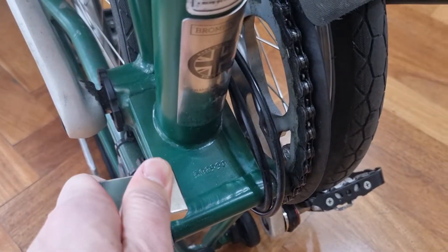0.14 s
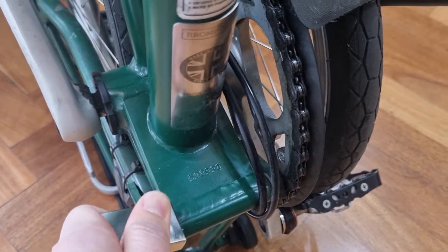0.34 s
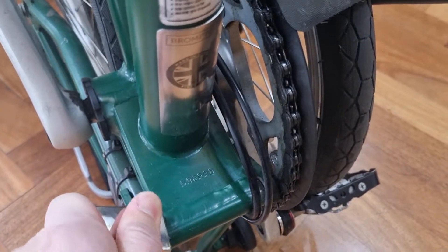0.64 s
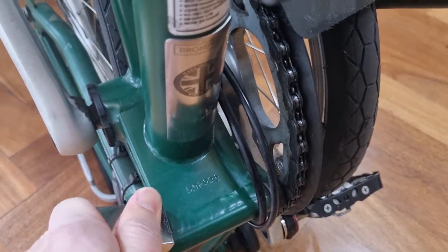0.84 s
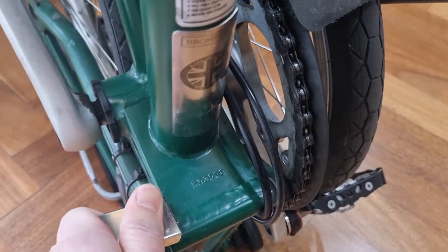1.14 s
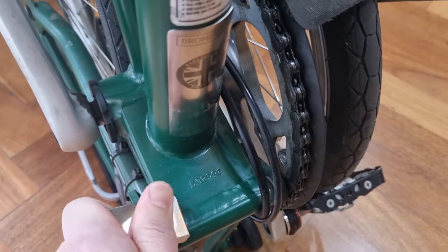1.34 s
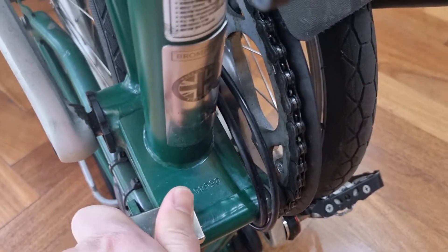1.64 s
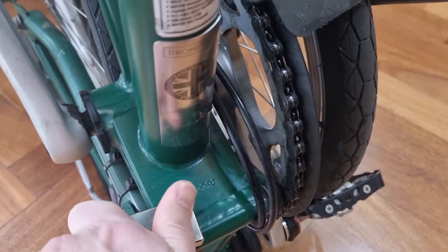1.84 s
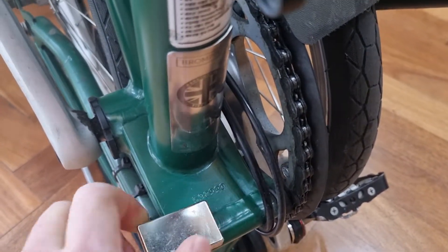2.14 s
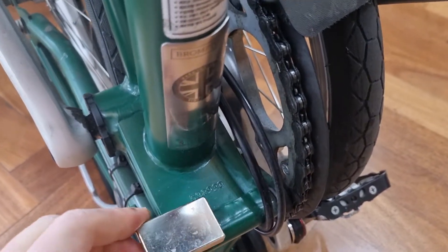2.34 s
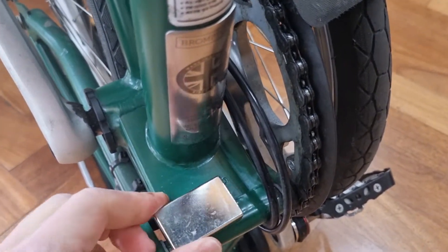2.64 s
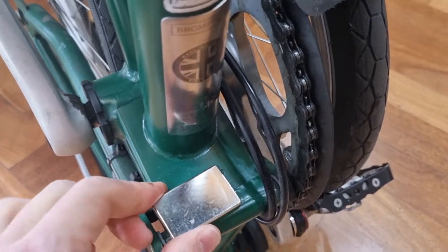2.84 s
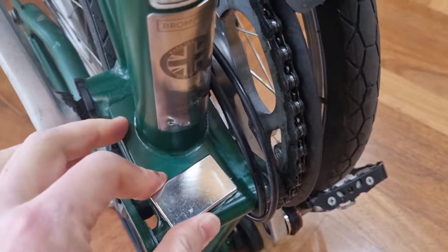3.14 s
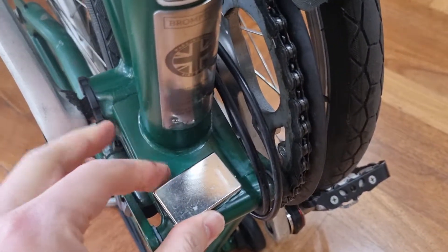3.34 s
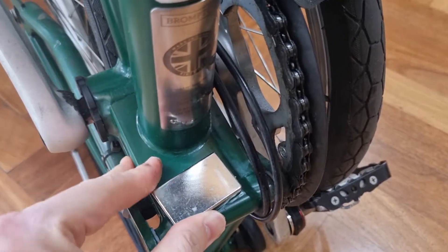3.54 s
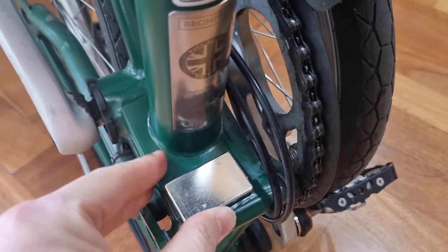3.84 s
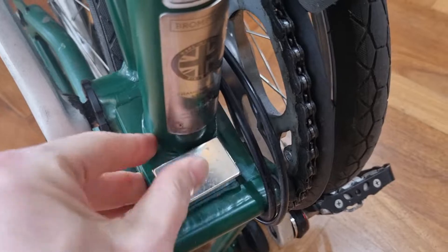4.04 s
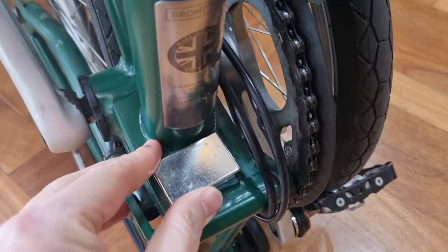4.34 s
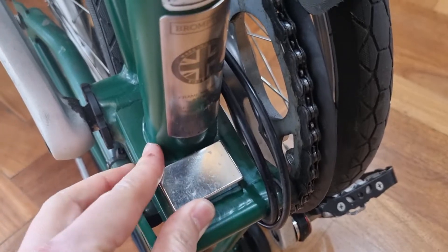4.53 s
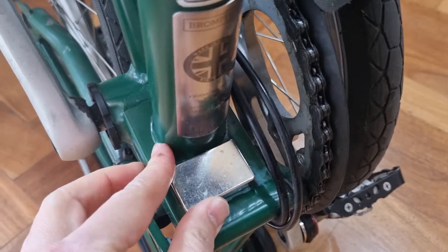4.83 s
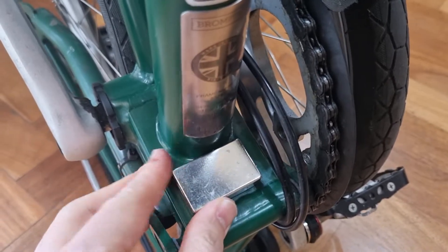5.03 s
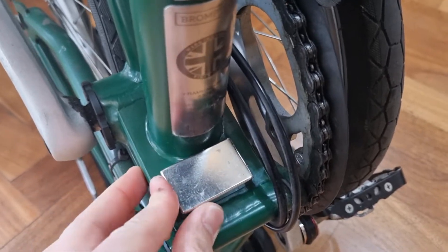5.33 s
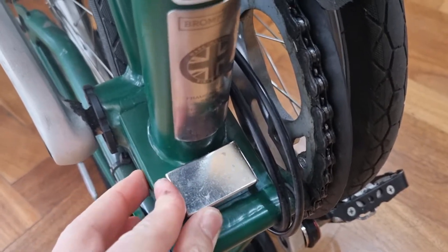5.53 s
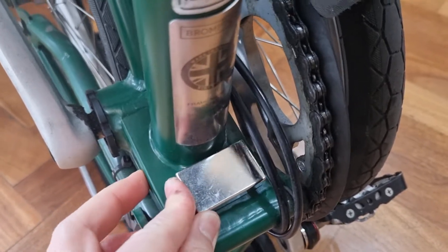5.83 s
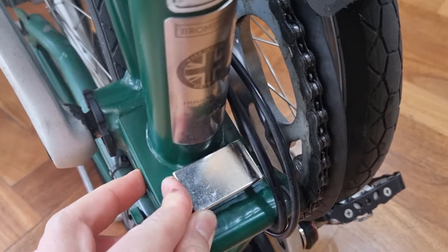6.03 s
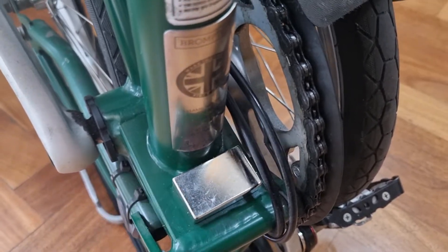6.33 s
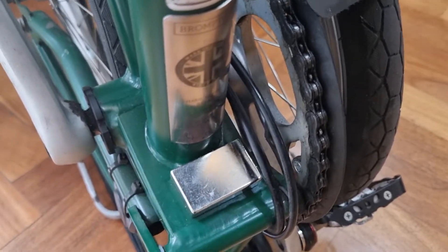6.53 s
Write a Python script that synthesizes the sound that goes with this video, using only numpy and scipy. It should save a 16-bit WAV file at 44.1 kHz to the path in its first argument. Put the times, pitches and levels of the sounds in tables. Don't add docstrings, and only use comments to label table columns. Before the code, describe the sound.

A heavy magnet is pulled off a steel bicycle frame, then snaps back three times with hard, bright metallic clacks in a quiet room.

```python
import sys
import numpy as np
from scipy import signal
from scipy.fft import rfft, irfft
from scipy.io import wavfile
from scipy.ndimage import uniform_filter1d

SR = 44100
rng = np.random.default_rng(int(sys.argv[2]) if len(sys.argv) > 2 else 0)


def file_out(sig):
    cols = np.atleast_2d(sig).T
    lim = np.clip(cols, -1, 1)
    pcm = np.round(lim * 32767).astype(np.int16)
    wavfile.write(sys.argv[1], SR, pcm)


def voltage_ratio(decibels):
    exponent = np.asarray(decibels, float) / 20
    return 10 ** exponent


N = 294367
PUFF_LEAD_S = 64 / SR
PORT_LAG_S = .00022


def rms_one(x):
    return x / np.sqrt(np.mean(x ** 2) + 1e-20)


def in_time(rows):
    s, *columns = np.transpose(rows)
    return [np.interp(np.arange(N) / SR, s, c) for c in columns]


def at_hz(points, hz):
    table_hz, values = np.array(points).T
    return np.interp(np.log(np.maximum(hz, 1)), np.log(table_hz), values)


def band(x, low_hz, high_hz, order=2):
    return signal.sosfilt(signal.butter(order, [low_hz, high_hz], "band", fs=SR, output="sos"), x)


def resonance(hz, mode_hz, width_hz):
    return 1 / (1 + (2 * (hz - mode_hz) / width_hz) ** 2)


def drift(rate):
    knots = rng.standard_normal(int(rate * N / SR) + 2)
    curve = np.interp(np.arange(N) * rate / SR, np.arange(len(knots)), knots)
    return uniform_filter1d(curve, size=2000)


def add(out, s, sound):
    i = int(s * SR)
    out[..., i:i + sound.shape[-1]] += sound[..., :max(N - i, 0)]


def place(out, s, sound, pan_db):
    add(out[0], s, sound[0] * voltage_ratio(pan_db / 2))
    add(out[1], s + PORT_LAG_S, sound[1] * voltage_ratio(-pan_db / 2))


def ring(hz, t60, rise_s, seconds):
    t = np.arange(int(seconds * SR)) / SR
    onset = (1 - np.exp(-t / rise_s)) ** 2
    decay = voltage_ratio(-60 * t / np.reshape(t60, (-1, 1)))
    return onset * decay * np.sin(2 * np.pi * np.reshape(hz, (-1, 1)) * t)


def causal(db):
    folded = irfft(db * np.log(10) / 20)
    folded[1:len(db) - 1] *= 2
    folded[len(db):] = 0
    return np.exp(rfft(folded))


def burst(colour_db, t60, rise_s):
    t = np.arange(8192) / SR
    shared, left, right = rng.standard_normal((3, 8192))
    puff = shared + np.array([left, right])
    puff = puff * (1 - np.exp(-t / rise_s)) * voltage_ratio(-60 * t / t60)
    puff = np.roll(puff, 64, axis=1)
    colour = causal(colour_db(np.fft.rfftfreq(8192, 1 / SR) + 1))
    puff = irfft(rfft(puff) * colour)[:, :6000]
    return puff / abs(puff).max()


# (frequency [Hz], likeness [-1 to 1])
LIKENESS = [(60, 0.97), (130, 0.97), (290, 0.43), (640, -0.46), (1410, -0.46), (3100, -0.11), (6820, 0.04),
            (15000, 0.01)]


def stereo_noise(spectrum, low_hz, high_hz):
    hz = np.fft.rfftfreq(N, 1 / SR)
    mid, side = rfft(rng.standard_normal((2, N))) * voltage_ratio(at_hz(spectrum, hz))
    alike = np.clip(at_hz(LIKENESS, hz), -1, 1)
    mid = np.sqrt(1 + alike) * mid
    side = np.sqrt(1 - alike) * side
    inside = (hz > low_hz) & (hz < high_hz)
    rms = np.sqrt(2 * np.sum(abs(mid[inside]) ** 2)) / N
    return irfft((mid + side * np.array([[1], [-1]])) / rms, N)


# (frequency [Hz], density [dB per Hz])
ROOM_TONE = [(60, -18), (90, -1.5), (110, -10.5), (160, -12), (250, -17.5), (340, -15), (450, -20),
             (560, -17), (800, -22.5), (1200, -27), (1800, -38.5), (3000, -53.5)]


def traffic_wash():
    fade_db = -0.41 * np.arange(N) / SR
    return voltage_ratio(-70 + fade_db + .6 * drift(9.0)) * stereo_noise(ROOM_TONE, 300, 1500)


# (frequency [Hz], density [dB per Hz])
HISS = [(800, -10), (2000, 0), (4000, -5.5), (7500, -10), (8500, -16), (16000, -16)]


def hiss():
    return voltage_ratio(-94) * stereo_noise(HISS, 800, 16000)


# (time [s], level [dB])
RUB = [(0, -79), (.3, -90), (.4, -74), (.8, -84), (2.4, -84.5), (3.6, -93), (4.3, -89.5), (4.7, -100)]
# (frequency [Hz], density [dB per Hz])
RUB_COLOUR = [(800, -12), (2000, 2.5), (3500, -2), (5000, -7.5), (7500, -3.5), (8500, -13.5),
              (15000, -18.5)]


def skin_rub():
    level_db = in_time(RUB)[0]
    return voltage_ratio(level_db) * stereo_noise(RUB_COLOUR, 800, 16000)


# (time [s], frequency [Hz], level [dB])
DRONE = [(0.0, 69.7, -51.5), (0.39, 70.7, -54.5), (0.5, 60.79, -70), (0.63, 71.83, -51.5),
         (0.85, 74.85, -47.5), (1.6, 75.24, -43.5), (2.25, 74.27, -59.5), (2.32, 76.7, -61.5),
         (2.51, 76, -47.5), (2.84, 72.33, -57.5), (3.53, 73.7, -44.5), (4.5, 70.04, -48), (4.57, 69.3, -61),
         (4.66, 60.8, -52.5), (5.5, 62.72, -72.5), (6.04, 61.8, -52.5), (6.13, 58.46, -70), (6.67, 59, -53)]


def drone():
    waver_db, waver_per_s = 1.5, 6.0
    gear_s = 5.17
    hz, db = in_time(DRONE)
    slowed = np.clip((np.arange(N) / SR - gear_s) / 0.13, 0, 1)
    turn = 2 * np.pi * np.cumsum(hz) / SR + np.array([[.1], [-.1]])
    line = np.sqrt(2) * voltage_ratio(db + waver_db * drift(waver_per_s)) * np.sin(turn)

    note_noise, rumble_noise = rng.standard_normal((2, N))
    loose_note = voltage_ratio(-68.5) * rms_one(band(note_noise, 130, 135))
    octave = slowed * voltage_ratio(-62 + waver_db * drift(waver_per_s)) * np.sin(2 * turn[0])

    both_ports = rumble_noise + 0.085 * note_noise * np.array([[1], [-1]])
    gusts_db = -56.5 + 5.5 * drift(4.0)
    rumble = voltage_ratio(gusts_db) * rms_one(band(both_ports, 44, 70, order=3))
    return (line + rumble) * voltage_ratio([[.4], [-.4]]) + (loose_note + octave) * voltage_ratio([[2.5], [-2.5]])


CLOCK_DB = (-64, -66)
# (frequency [Hz], level [dB], t60 [s])
CLOCK_MODES = [(2190, 0, .07), (2680, -6, .04)]


def clock():
    first_s, period_s, tock_late_s = .133, .4762, .022
    out = np.zeros(N)
    hz, db, t60 = np.transpose(CLOCK_MODES)
    for k in range(14):
        is_tock = k % 2
        s = first_s + k * period_s + is_tock * tock_late_s
        add(out, s, voltage_ratio(CLOCK_DB[is_tock] + db) @ ring(hz, t60, .002, .2))
    return out * [[1], [-.25]]


# (time [s], peak level [dB], brightest frequency [Hz], t60 [s])
CHINKS = [(.36, -52.5, 3200, 0.035), (0.491, -55.5, 6170, .006), (0.679, -57.5, 1500, 0.069),
          (1.285, -54.5, 6540, 0.06), (1.32, -49, 6300, .008), (1.3235, -48, 6200, .015),
          (1.2953, -47, 12700, .006), (3.393, -59, 5940, 0.0092), (3.491, -72.5, 7495, 0.044),
          (4.721, -70, 7350, 0.024), (4.819, -75, 7456, 0.032), (4.893, -70, 7290, 0.018),
          (5.508, -82, 7500, 0.073), (5.625, -73.5, 8630, 0.0064), (5.719, -66.5, 8260, 0.15),
          (5.729, -66, 2000, 0.04), (5.73, -68, 5700, .02), (5.858, -68, 2200, .04),
          (3.733, -47.5, 6480, 0.014), (5.179, -66.5, 5810, 0.018), (6.6155, -52, 3700, .008), ]
# (time [s], peak level [dB], brightest frequency [Hz],
# t60 [s])
KNOCKS = [(.414, -27.5, 2120, 0.036), (.42, -41, 1200, .04), (0.438, -51, 1630, 0.19),
          (.425, -42, 840, 0.14), (.459, -43, 1100, 0.055), (0.5238, -42, 2400, 0.044),
          (.431, -46, 2600, 0.053), (.461, -47.5, 2580, 0.068), (.526, -48, 560, 0.1),
          (.524, -48, 1350, .03), (.448, -46, 1150, .03), (.475, -50, 700, .06), (.608, -60, 1600, .02),
          (.636, -49.5, 725, 0.037), (.856, -57.5, 1223, .033), (1.278, -49, 2746, 0.053),
          (1.284, -40.5, 2773, 0.035), (1.295, -41.5, 12760, 0.0061), (1.32, -48, 9680, 0.02),
          (3.735, -51, 1990, 0.025), (1.3, -52, 3200, .03), (6.257, -51, 750, .025), ]
# (time [s], peak level [dB], brightest frequency
# [Hz], t60 [s])
TICKS = [(.361, -45, 1200, 0.026), (1.285, -46.5, 1290, 0.044), (1.283, -54, 6500, .02),
         (1.428, -66, 9000, .005), (0.365, -52, 5870, 0.11), (.385, -51, 5940, 0.045),
         (0.606, -62, 4556, 0.012), (0.673, -61.5, 3980, 0.021), (1.089, -66, 3456, 0.078),
         (1.313, -53, 9130, 0.0061), (1.527, -61, 3000, 0.006), (2.02, -66, 3276, 0.072),
         (3.37, -62, 5970, 0.011), (3.417, -59, 7090, 0.031), (4.29, -63, 7894, 0.0088),
         (5.706, -63, 5060, .011), (6.218, -65, 7500, .01), (.372, -54, 9000, .04),
         (0.409, -58, 10000, 0.034), (.525, -53, 3500, .02), (.36, -55, 6000, .05),
         (6.6155, -42, 5800, .012), (6.255, -66, 6000, .015), ]
# (spread [octaves], left over right [dB], sent to the walls [dB])
TOUCH_KINDS = [
    (.22, 11, -13),
    (.62, 6.5, -6),
    (1.398, 6.5, -10),
]
# (frequency [Hz], width [Hz])
PLATE = [(560, 140), (730, 92), (1190, 75), (1550, 120), (2000, 420), (2360, 280), (3150, 1800),
         (3800, 670), (4600, 140), (5300, 100), (6200, 606), (7100, 550)]


def touches():
    out, sent = np.zeros((2, N)), 0
    plate_hz, width_hz = np.transpose(PLATE)
    for rows, (spread, pan_db, send_db) in zip((CHINKS, KNOCKS, TICKS), TOUCH_KINDS):
        kind = np.zeros((2, N))
        for s, db, hz, t60 in rows:
            def colour_db(f):
                hump_db = np.maximum(-6 * (np.log2(f / hz) / spread) ** 2, -42)
                return hump_db + 9.5 * np.max(resonance(f[:, None], plate_hz, width_hz), axis=1)
            touch = voltage_ratio(db) * burst(colour_db, t60, rise_s=.0006)
            place(kind, s - PUFF_LEAD_S, touch, pan_db)
        out = out + kind
        sent = sent + voltage_ratio(send_db) * kind
    return out, sent


# (time [s], peak level [dB], frequency [Hz], t60 [s])
PINGS = [(.361, -50, 3200, .04), (.4145, -41, 2002, .035), (.4145, -42, 2352, .035),
         (.4145, -43, 3129, .03), (.4145, -45, 1146, .05), (.4145, -45, 1277, .05), (.4145, -45, 724, .07),
         (.524, -50, 2350, .025), (.524, -52, 3130, .02), (6.6155, -41, 5600, .012)]


def pings():
    out = np.zeros((2, N))
    for s, db, hz, t60 in PINGS:
        place(out, s, voltage_ratio(db) * ring([hz, hz], t60, 0.00013, .2), 13.0)
    return out


# (time [s], peak level [dB], frequency [Hz], t60 [s])
THUDS = [(0.364, -18, 107, 0.022), (0.365, -40.5, 253, 0.087), (0.467, -39.5, 303, 0.078),
         (1.301, -45.5, 37, 0.38), (1.65, -32, 253, 0.11), (2.66, -39.5, 281.2, 0.097),
         (3.975, -47, 36, .2), (3.984, -44, 267.5, 0.13), (3.99, -47.5, 520.7, 0.15)]


def thuds():
    out = np.zeros(N)
    for s, db, hz, t60 in THUDS:
        add(out, s, voltage_ratio(db) * ring([hz, hz * .67], [t60, t60], 0.0087, 0.27).sum(axis=0))
    return out


# (landing time [s], level [dB], rise [dB per s])
LEAD_INS = [
    (1.6457, -44.5, 698.5),
    (2.6208, -37.5, 1003),
    (3.9704, -33, 703.5),
]
# (frequency [Hz], width [Hz], level [dB])
LEAD_IN_BANDS = [
    [(2400, 500, 10), (4306, 400, 12.5), (6460, 607, 7)],
    [(1700, 500, 7), (3800, 900, 12), (7500, 1200, 14.5)],
    [(2652, 400, 9), (3700, 500, 13), (4400, 400, 10), (6655, 1000, 13)],
]


def lead_ins():
    length = 1300
    out = np.zeros((2, N))
    before = np.arange(-length, 0) / SR
    hz = np.fft.rfftfreq(length, 1 / SR)
    for (s, db, rise_db), colour, modes in zip(LEAD_INS, CRACKS, LEAD_IN_BANDS):
        bands_db = sum(top_db * resonance(hz, mode_hz, width_hz) for mode_hz, width_hz, top_db in modes)
        soft_noise = irfft(rfft(rng.standard_normal((2, length))) * voltage_ratio(at_hz(colour, hz) + bands_db))
        fade_in = np.minimum((before - before[0]) / 0.012, 1)
        swell = voltage_ratio(db + rise_db * before) * fade_in
        place(out, s + before[0], rms_one(soft_noise) * swell, 0)
    return out


# (time [s], ring level [dB], ring frequency [Hz], left over right [dB], crack level [dB])
SNAPS = [
    [(1.6455, -13.5, 2620, 15.5, -10), (1.647, -13.5, 1680, 0.5, -25.5), (1.649, -19, 6510, 18.5, -24),
     (1.6493, -20.5, 2220, 21.5, -34), (1.6493, -18.5, 4320, -7, -17.5), (1.6495, -38, 9100, 0, -40),
     (1.654, -23, 2500, 5, -20), (1.6575, -25, 2300, 0, -26)],
    [(2.61, -38, 7300, 10, -50), (2.6165, -27, 7390, 14, -45.5), (2.619, -27, 7400, 14, -45),
     (2.6216, -15, 3840, -8.5, -4), (2.6216, -13, 2000, 14, -30), (2.6235, -24, 12500, -8, -30),
     (2.627, -19, 2150, 14, -30), (2.6222, -7, 7460, 11.5, -22.5), (2.6243, -11, 7180, 5.5, -20),
     (2.6262, -12.5, 7100, 6.5, -19), (2.629, -22, 3900, -5, -26), (2.6375, -20.5, 6970, 15.5, -20.5),
     (2.6395, -14, 7400, 14.5, -34.5), (2.6432, -2, 7700, 3, -3.5), (2.6434, -20, 3150, -2.5, -29.5),
     (2.6436, -25, 12600, -8, -30), (2.6436, -22, 4900, 0, -30), (2.6472, -16, 7200, 4.5, -14)],
    [(3.9655, -26, 3930, 3.5, -18.5), (3.9714, -20.5, 3770, -9, -8.5), (3.9718, -19, 2770, -11.5, -40),
     (3.9722, -9, 7240, 3, -12.5), (3.9765, -5, 6400, 9, -21), (3.9718, -31, 14200, -6, -35),
     (3.9585, -36, 6500, 10, -48), (3.9635, -30, 6600, 10, -40), (3.978, -12.5, 6800, 1, -30.5),
     (3.979, -24, 3200, -3, -20), (3.9735, -21.5, 3700, -3.5, -15), (3.9905, -26, 3500, -0.5, -26),
     (3.9935, -21, 6200, -2.5, -28.5)],
]
# (frequency [Hz], density [dB per Hz])
CRACKS = [
    [(180, -44.5), (300, -26), (446, -22.5), (640, -17), (860, -12), (956, -17), (1130, -6), (1250, -10),
     (1800, -13), (2600, -8), (6530, -13), (9000, -23), (15700, -42)],
    [(180, -49.5), (350, -32), (545, -22), (722, -21), (1100, -8), (1600, -9), (1850, -12), (3200, -6.5),
     (6530, -6.5), (7700, -5), (11100, -18), (15700, -17)],
    [(180, -38.5), (300, -12.5), (485, -35.5), (592, -25), (1000, -23), (1250, -14), (1570, -9.5),
     (3660, -4.5), (5010, -10), (6310, -3.5), (7090, -10), (15700, -29)],
]
CRACK_PAN_DB = [3, -1.5, -1.5]


def snaps():
    rings, cracks = np.zeros((2, N)), np.zeros((2, N))
    seated_t60_s, t60_doubles_per_db = .0045, .11
    most_cycles = 75
    for contacts, colour, modes, side_db in zip(SNAPS, CRACKS, TUBES, CRACK_PAN_DB):
        tube_hz = np.array(modes)[:, 0]

        def colour_db(f):
            return at_hz(colour, f) + 5 * np.max(resonance(f[:, None], tube_hz, 110), axis=1)
        for s, db, hz, pan_db, crack_db in contacts:
            t60 = min(seated_t60_s * 2 ** (-db * t60_doubles_per_db), most_cycles / hz)
            mode = ring([hz, hz], t60, .0005, .1)
            place(rings, s, voltage_ratio(db) * mode / mode.max(), pan_db)
            crack = burst(colour_db, t60=0.012, rise_s=0.00033)
            rattle = voltage_ratio(-12) * burst(colour_db, t60=0.052, rise_s=.002)
            place(cracks, s - PUFF_LEAD_S, voltage_ratio(crack_db) * (crack + rattle), side_db)
    return rings, cracks


LANDINGS_S = [1.647, 2.623, 3.973]
# (frequency [Hz], level [dB], t60 [s])
TUBES = [
    [(545, -45, .25), (759, -58, 1.0), (1136, -48, .25), (1675, -58, .55), (2239, -51, .3),
     (2557, -48, .33), (2853, -40, .36), (3585, -48, .33), (4290, -43, .36), (4549, -49, .36),
     (6551, -45, .25)],
    [(545, -46, .4), (760, -59, 1.6), (813, -59, 1.2), (1600, -47, .55), (1640, -42, .7), (1690, -47, .5),
     (1933, -46, .43), (2690, -56, 1.3), (2724, -48, .45), (3252, -45, .38), (3682, -44, .4),
     (4129, -45, .33), (4522, -46, .35), (4915, -44, .36), (5087, -41, .3)],
    [(560, -52, .3), (807, -62, 1.0), (1650, -46, .55), (1997, -48, .4), (2309, -50, .36), (2692, -54, .9),
     (3042, -49, .37), (3620, -43, .48), (4060, -41, .52), (5087, -48, .38), (5475, -49, .3),
     (5975, -52, .43)],
]


def tubes():
    beats_per_s, steady_share = 24, .85
    out, t = np.zeros((2, N)), np.arange(SR) / SR
    for s, modes in zip(LANDINGS_S, TUBES):
        for hz, db, t60 in modes:
            knots = rng.standard_normal((2, 2, beats_per_s + 1))
            for port, (real, imag) in enumerate(knots):
                beating = np.interp(t * beats_per_s, np.arange(len(real)), real + 1j * imag)
                flutter = steady_share + beating / 2
                wave = (flutter * np.exp(2j * np.pi * (hz * t + port * .3))).imag
                add(out[port], s, voltage_ratio(db - 60 * t / t60) * np.minimum(t / .01, 1) * wave)
    return out


# (frequency [Hz], t60 [s])
ROOM_DECAY = [(300, .3), (800, .43), (2100, .46), (5500, .39), (9000, .3), (14600, .23)]
# (frequency [Hz], level [dB])
ROOM_COLOUR = [(300, -4.5), (1000, -2.5), (3000, 0.5), (7000, 0), (15000, -0.5)]


def room(x, wet_db, onset_s):
    t = np.arange(int(.8 * SR)) / SR
    edges = 200 * 2 ** np.arange(0, 6.6, .5)
    white, tail = rng.standard_normal((2, 2, len(t))), 0
    for k, (low, high) in enumerate(zip(edges, edges[1:])):
        hz = np.sqrt(low * high)
        decay_db = at_hz(ROOM_COLOUR, hz) - 60 * t / at_hz(ROOM_DECAY, hz)
        tail = tail + band(white[k % 2], low, high) * voltage_ratio(decay_db)
    tail = tail * (1 - np.exp(-(t / onset_s) ** 2)) * voltage_ratio(wet_db)
    return signal.fftconvolve(x, tail, axes=1)[:, :N]


def widen(x, boost_db):
    mid, side = (x[0] + x[1]) / 2, (x[0] - x[1]) / 2
    side = side + voltage_ratio(boost_db) * band(side, 350, 1500, order=1)
    return np.array([mid + side, mid - side])


def scene():
    rings, cracks = snaps()
    ticks, ticks_sent = touches()
    bumps = thuds() * voltage_ratio([[2.5], [-2.5]])
    tones = pings()
    sent = cracks + bumps + ticks_sent + voltage_ratio(-20) * tones + voltage_ratio(-15.5) * rings
    near = rings + cracks + ticks + tones - bumps + lead_ins() + tubes()
    near = near + room(sent, wet_db=-32, onset_s=0.0052)
    background = traffic_wash() + hiss() + skin_rub()
    return widen(near, boost_db=-11) + background + drone() + clock()


def band_limit(x):
    return signal.sosfilt(signal.butter(12, 15850, fs=SR, output="sos"), x)


def record(dry):
    limited = np.tanh(dry / 1.15) * 1.15
    cut = signal.sosfilt(signal.cheby2(10, 60, 16300, fs=SR, output="sos"), limited)
    return band_limit(cut)


dry = scene()
out = record(dry)
file_out(out)
```